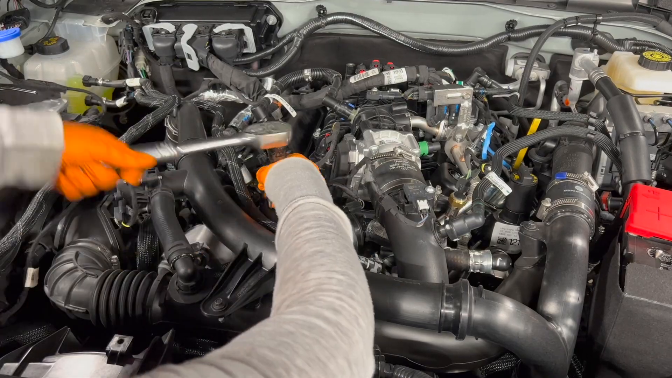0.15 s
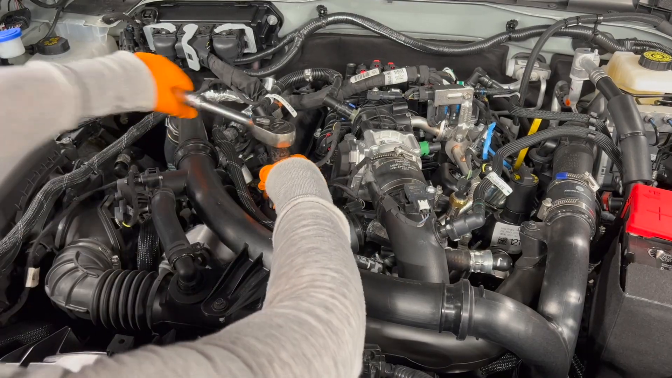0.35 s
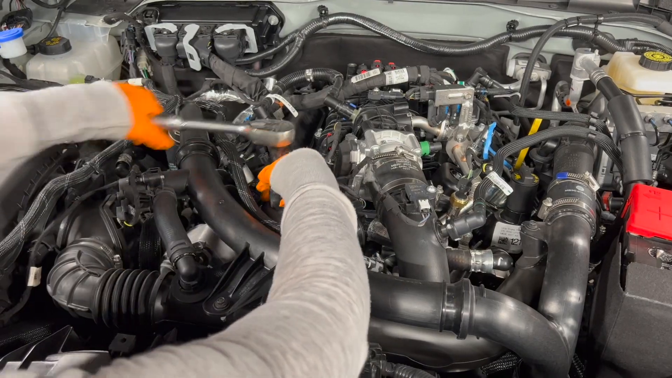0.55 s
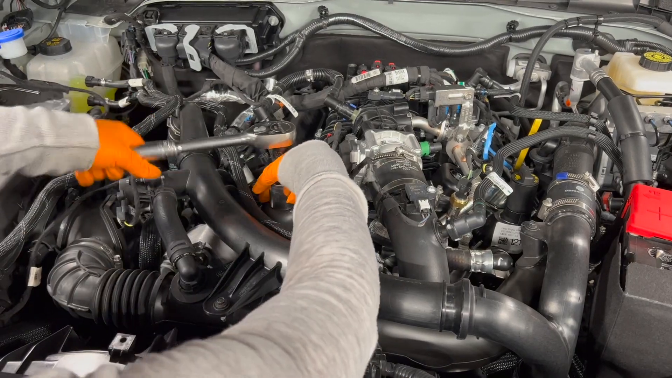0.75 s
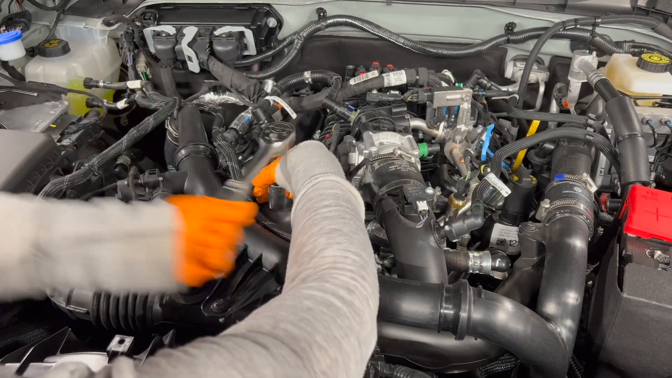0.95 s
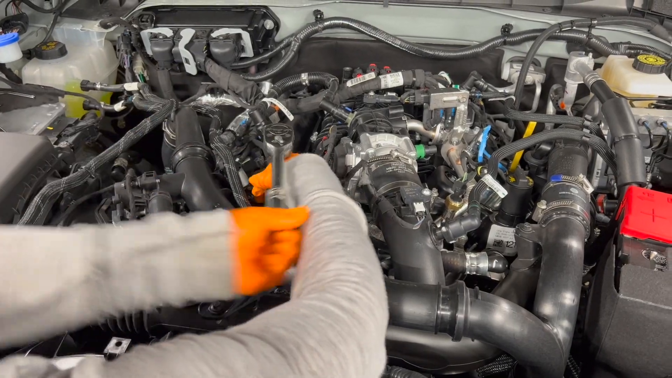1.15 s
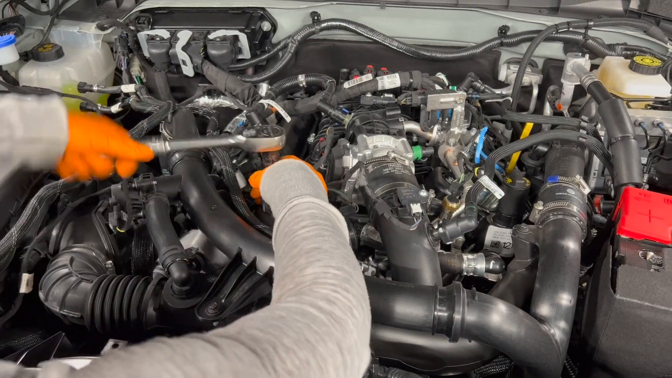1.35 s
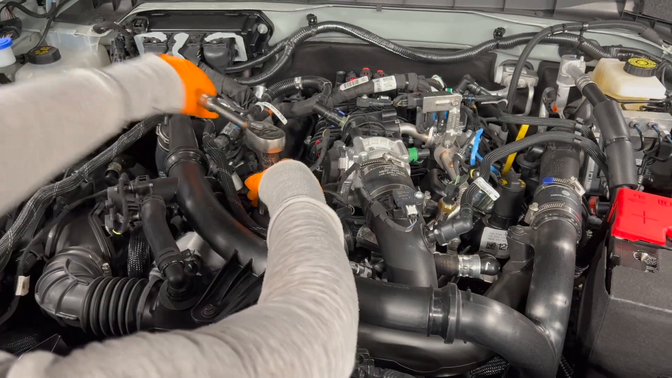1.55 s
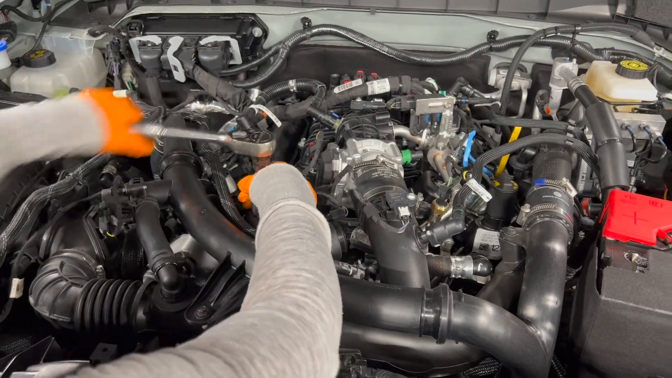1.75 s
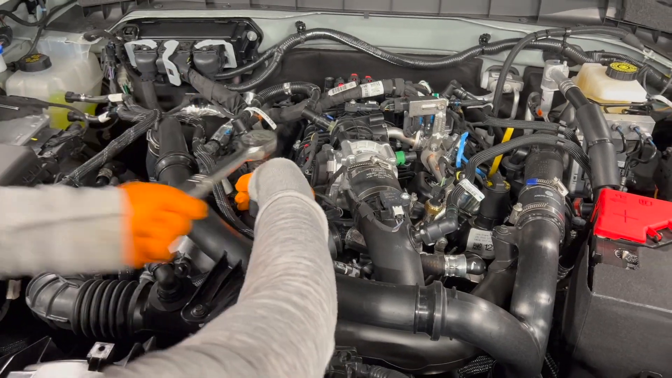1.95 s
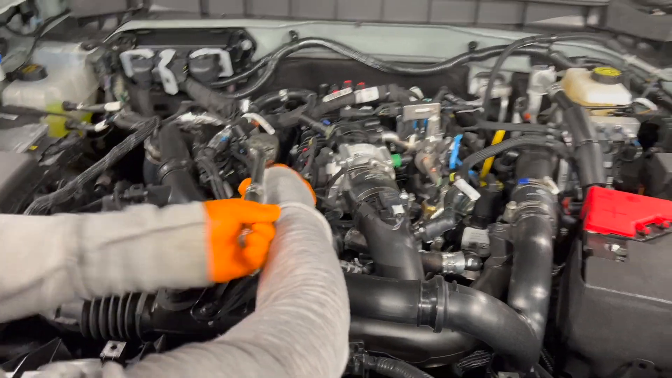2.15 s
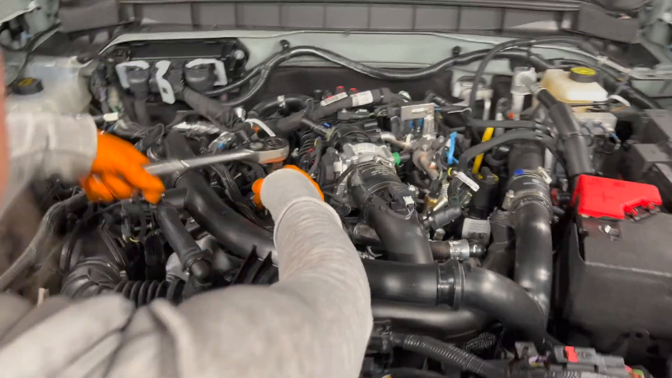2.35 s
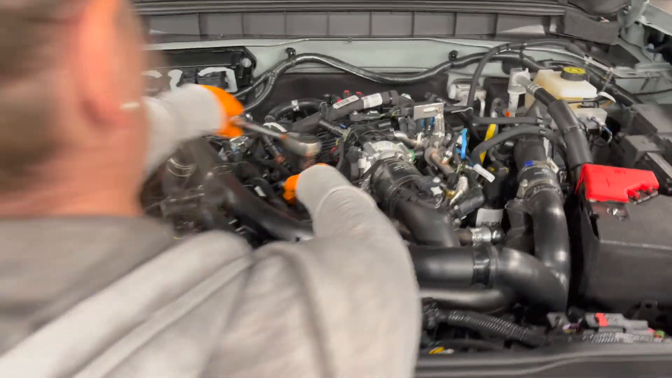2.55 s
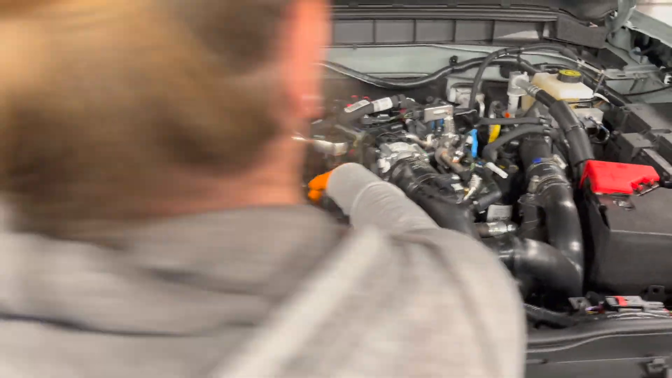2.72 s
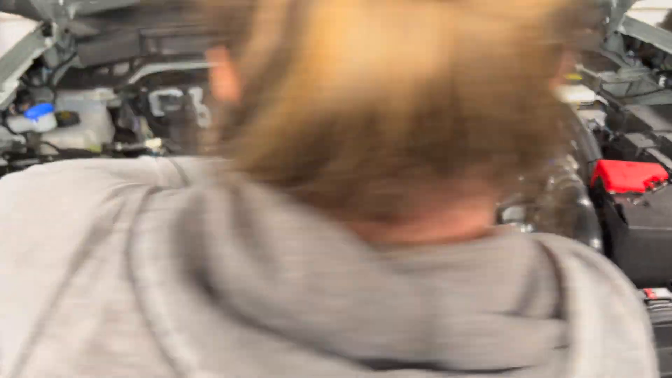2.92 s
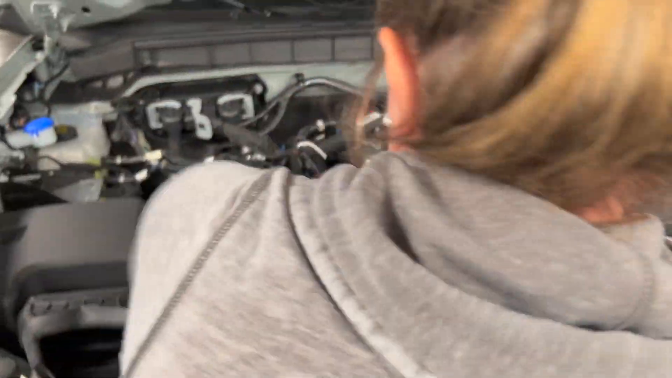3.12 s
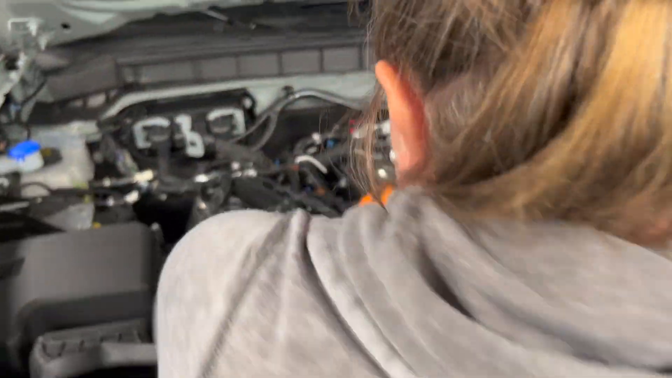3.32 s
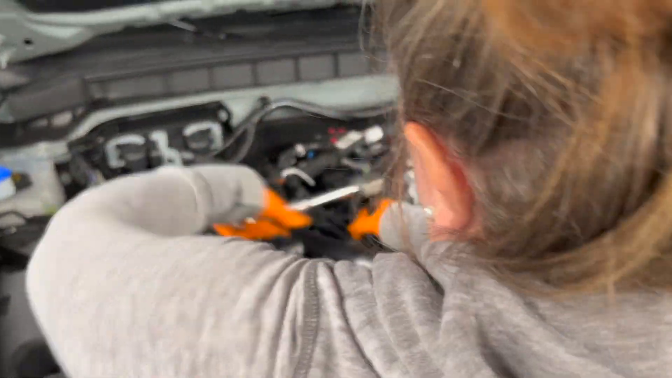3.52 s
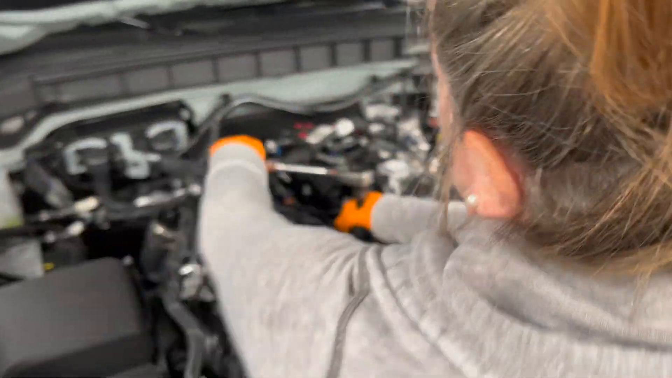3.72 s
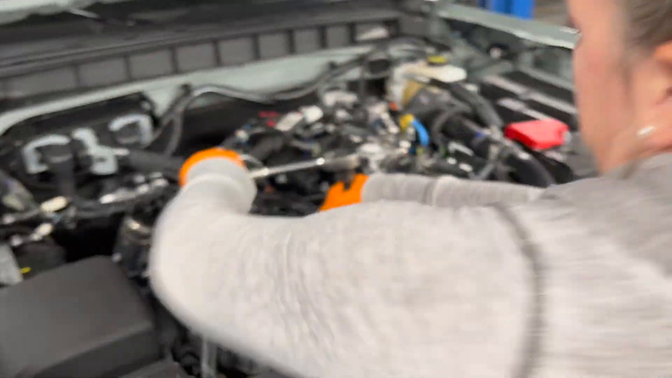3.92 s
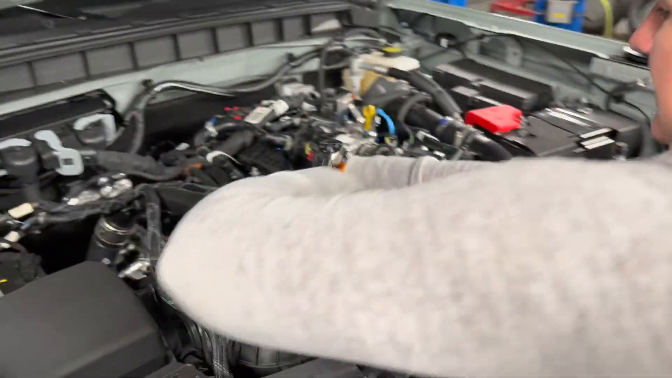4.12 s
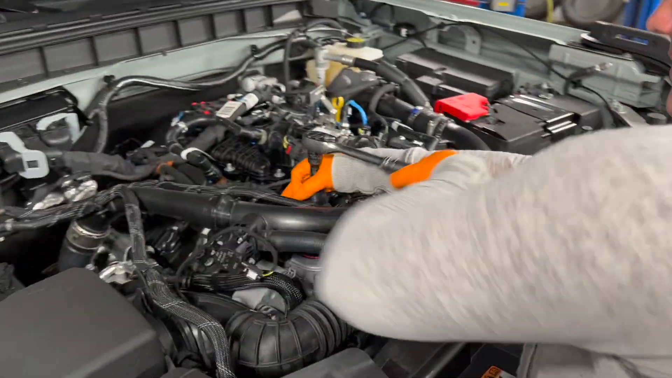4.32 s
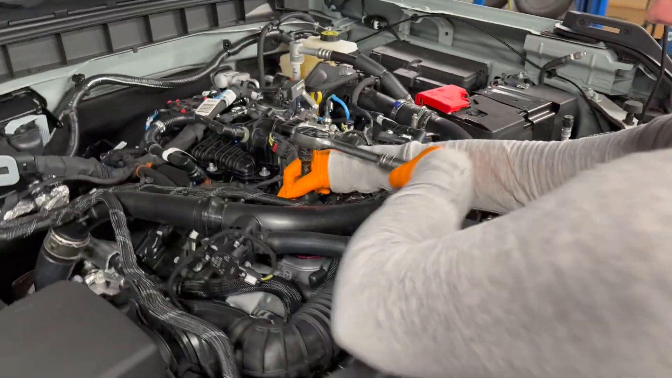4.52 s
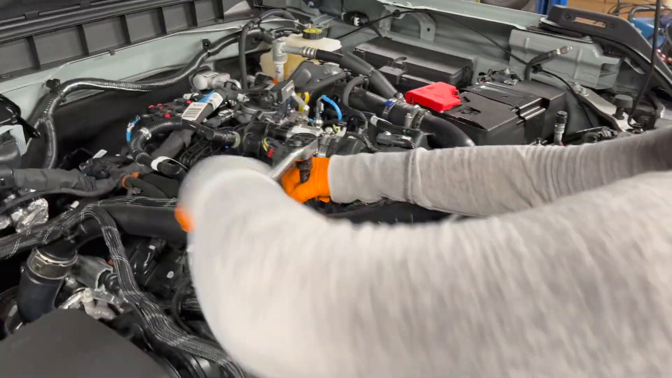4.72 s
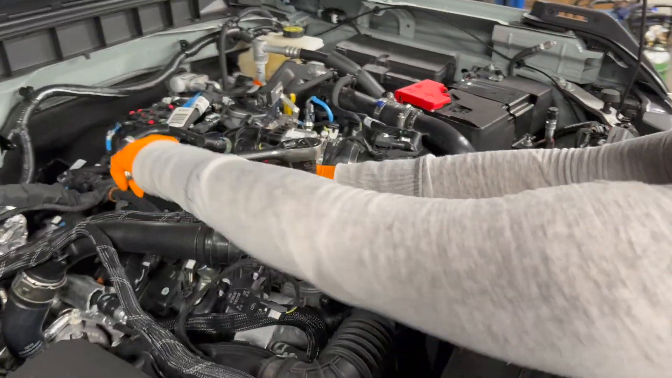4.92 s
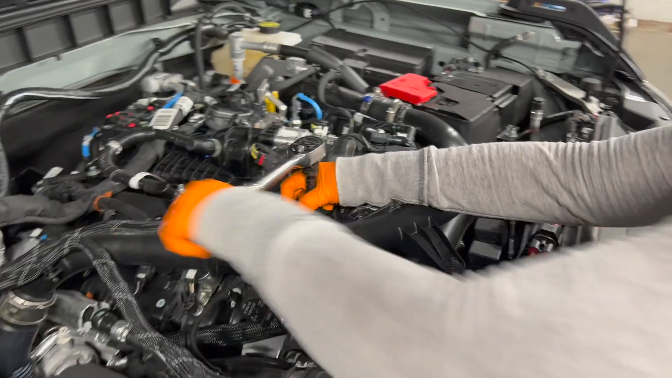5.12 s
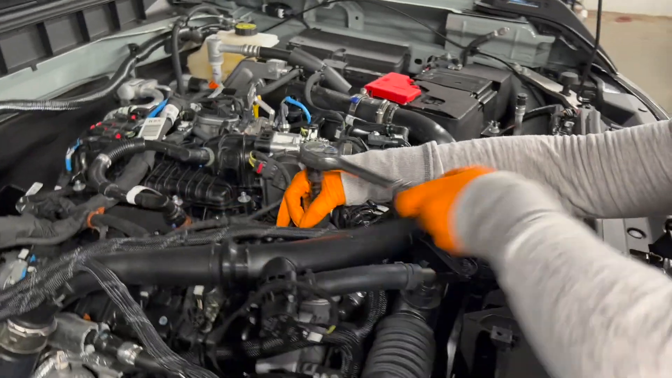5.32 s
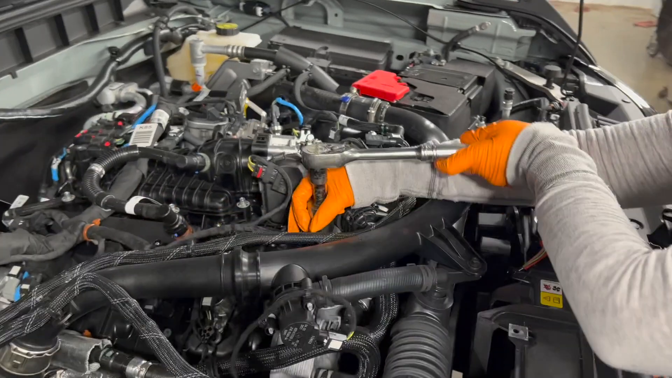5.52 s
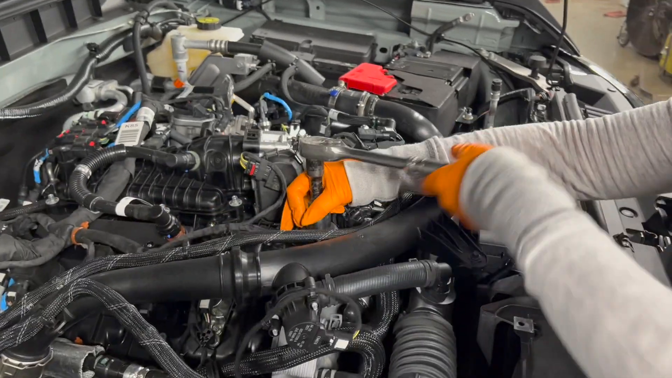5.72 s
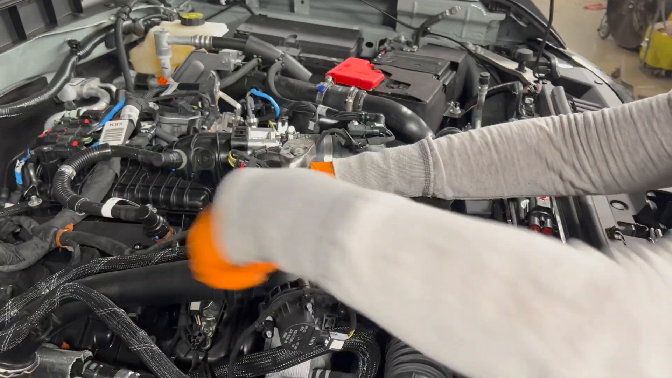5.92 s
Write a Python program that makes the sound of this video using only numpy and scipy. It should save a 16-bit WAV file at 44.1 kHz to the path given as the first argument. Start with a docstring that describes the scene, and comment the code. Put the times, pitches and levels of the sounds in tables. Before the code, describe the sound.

Short runs of crisp ratchet clicks repeat about once a second, separated by dull taps and cloth rubbing, above quiet wavering machine hum.

```python
"""A low wavering hum over moving air is heard first, then the quick clicks of a long hand ratchet in an engine bay.
On six back-swings the pawl drops once per tooth turned; each drop is a noise burst ringing steel tool and casting.
Between swings the socket knocks and taps as it is loaded, cloth rubs and swishes as filtered noise, and plastic
snaps once as a damped impulse. A diffuse garage tail follows, and two phone ports close by receive the sum."""
import sys
import numpy as np
from scipy import signal
from scipy.fft import rfft, irfft
from scipy.io import wavfile
from scipy.ndimage import uniform_filter1d

SR = 44100
rng = np.random.default_rng(int(sys.argv[2]) if len(sys.argv) > 2 else 0)


def bounce(signal):
    """Save signal as a 16-bit WAV file at the path given by the first command-line argument."""
    frames = np.transpose(np.atleast_2d(signal))
    limited = np.clip(frames, -1, 1)
    pcm = np.round(limited * 32767).astype(np.int16)
    wavfile.write(sys.argv[1], SR, pcm)


N = 262831
TIME = np.arange(N) / SR
HIT_TIME = TIME[:4096]
BLOW = int(0.014 * SR)  # samples over which the level of a hit is defined
TOP_HZ = 16350


def undb(db):
    """Logarithmic level: decibels become an amplitude ratio."""
    return 10 ** (np.asarray(db) / 20)


def unit(x):
    """Normalisation: scale to rms 1."""
    return x / np.sqrt(np.mean(x ** 2))


def over_bins(points):
    """Interpolation on a log-frequency axis: (f/Hz, value) points give one value per FFT bin."""
    hz, value = np.transpose(points)
    bin_hz = np.arange(N // 2 + 1) * SR / N
    return np.interp(np.log(bin_hz + 1), np.log(hz), value)


def colour(x, points):
    """Spectral shaping: weight a sound by (f/Hz, level/dB) points, then scale to rms 1."""
    return unit(irfft(rfft(x) * undb(over_bins(points)), N))


def band(x, low_hz, high_hz, order=2):
    """Causal band-pass filtering."""
    return signal.sosfilt(signal.butter(order, [low_hz, high_hz], "band", fs=SR, output="sos"), x)


def walk(rate):
    """Slow random modulation: levels held 1 / rate s, slewed from one to the next, rms 1."""
    hold = int(SR / rate)
    held = np.repeat(rng.standard_normal(N // hold + 1), hold)
    return unit(uniform_filter1d(held, hold)[:N])


def fade(fade_s, hold_s=0.002):
    """Exponential decay, after close reflections have held the blow up for an instant."""
    return np.exp(-np.maximum(HIT_TIME - hold_s, 0) / fade_s)


def swell(middle_s, half_s):
    """Gaussian envelope: a movement gathers and subsides."""
    return np.exp(-np.minimum(np.abs(TIME - middle_s) / half_s, 10) ** 2)


def place(hits, times, dbs):
    """Superposition: add hits (event, 2, sample) in time, each at its rms level over the blow."""
    out = np.zeros((2, N + len(HIT_TIME)))
    for hit, s, db in zip(hits, times, dbs):
        i = int(s * SR)
        blow_rms = np.sqrt(np.mean(hit[:, :BLOW] ** 2))
        out[:, i:i + len(HIT_TIME)] += hit * undb(db) / blow_rms
    return out[:, :N]


# steady machine hum and mains hum: f/Hz, level/dB
HUM_TONES = [(70.9, -51), (120, -61.5), (141.8, -78)]
# spectrum of ventilation rumble and still air: f/Hz, relative level/dB
AIR_SPECTRUM = [(20, -46.5), (34, -3), (45, -3.5), (66, 4.5), (100, -0.5), (200, -20), (450, -31),
                (1200, -37), (6000, -41.5), (16000, -57)]
AIR_DB = -50


def hum(waver_db=-4.15):
    """Amplitude modulation: pure machine tones waver slowly over the broadband noise of moving air."""
    tones = 0
    for hz, db in HUM_TONES:
        amplitude = np.sqrt(2) * undb(db + waver_db * walk(5.1))
        tones = tones + amplitude * np.sin(2 * np.pi * (hz * TIME + rng.random()))
    return tones + undb(AIR_DB) * colour(rng.standard_normal((2, N)), AIR_SPECTRUM)


# arms and body shift between swings: middle t/s, half length t/s, rubbing level/dB, sleeve swish level/dB
SHIFTS = [(0.826, 0.19, -94, -70.5), (1.176, 0.02, -49.5, -79), (1.858, 0.24, -73, -69),
          (2.702, .04, -54.5, -75), (3.193, 0.187, -59.5, -81.5), (3.918, 0.065, -48.5, -51.5),
          (4.116, 0.15, -73.5, -69), (4.515, 0.14, -57.5, -69.5), (5.258, 0.14, -62, -60)]
RESTING_DB = -79.5  # cloth never quite rests
# the sleeve slides along with each swing; rise and fall are exponential time constants
SLEEVE_LEAD_S, SLEEVE_RISE_S, SLEEVE_FALL_S = 0.01, 0.063, 0.13
# the glove scuffs after every knock, relative to the knock column of KNOCKS
SCUFF_DB, SCUFF_S = -22, 0.025


def sliding():
    """Addition of powers: the rubbing grows before each swing, decays after it, and swells with shifts and scuffs."""
    power = undb(RESTING_DB) ** 2
    for s, half_s, db, _ in SHIFTS:
        power = power + (undb(db) * swell(s, half_s)) ** 2
    for course, *_, sleeve_db in SWINGS:
        early = np.maximum(course[0][0] - SLEEVE_LEAD_S - TIME, 0) / SLEEVE_RISE_S
        late = np.maximum(TIME - course[-1][0], 0) / SLEEVE_FALL_S
        power += (undb(sleeve_db) * np.exp(-early - late)) ** 2
    for s, knock_db, *_ in KNOCKS:
        i = int(s * SR)
        power[i:i + len(HIT_TIME)] += (undb(knock_db + SCUFF_DB) * fade(SCUFF_S)) ** 2
    return np.sqrt(power)


# spectrum of the rubbing cloth: f/Hz, relative level/dB
CLOTH_SPECTRUM = [(100, 5.5), (300, -3), (600, -2.5), (950, 1), (1500, -1), (4500, -13.5), (7000, -15),
                  (16000, -42.5)]


def rubbing(catch_db=1.5, flutter_db=5.0, fibre_db=2.5):
    """Stick-slip friction: cloth moves in small catches and slips, each register fluttering independently."""
    edges = np.geomspace(90, TOP_HZ, 8)
    slip = 0
    for low_hz, high_hz in zip(edges, edges[1:]):
        register = band(rng.standard_normal((2, N)), low_hz, high_hz)
        slip = slip + register * undb(flutter_db * walk(45))
    strength = sliding() * undb(catch_db * walk(55))
    return strength * colour(slip * undb(fibre_db * walk(500)), CLOTH_SPECTRUM)


def teeth(course, *levels):
    """Kinematics of the pawl: integrated handle speed gives one drop per tooth; rows are
    (t/s, speed/teeth per s, click level/dB, levels of the swing)."""
    s, speed, db = np.transpose(course)
    t = np.arange(s[0], s[-1], 1 / SR)
    turned = np.cumsum(np.interp(t, s, speed)) / SR
    drops = np.interp(np.arange(turned[-1]), turned, t)
    return [(drop, np.interp(drop, s, speed), np.interp(drop, s, db), *levels) for drop in drops]


GRIP_WIDTH_HZ = 85  # damping by the gloved hand, added to the width of every resonance


def ring(x, modes):
    """Modal superposition: a sum of damped resonances (f/Hz, width/Hz, level/dB), widened by the grip."""
    rung = 0
    for hz, width_hz, db in modes:
        quality = hz / (width_hz + GRIP_WIDTH_HZ)
        rung = rung + undb(db) * signal.lfilter(*signal.iirpeak(hz, quality, fs=SR), x)
    return rung


# resonances of the ratchet seated on the cap: f/Hz, width/Hz before the grip, level/dB
TOOL_MODES = [(983, 14, 1), (1207, 150, -11), (1445, 37, 6.5), (2144, 500, -1.5), (3106, 160, -0.5),
              (5990, 74, 4.5), (6422, 81, 5.5), (7590, 370, -1), (8034, 85, 0), (11805, 120, -9),
              (12860, 260, -4), (15350, 740, 8)]


def strikes(times, levels, parts, rebound_s, rebound, crack_db, grit, scatter_db):
    """Impact excitation: steel lands, rebounds once and chatters; the tool's modes ring in each part's register."""
    chance = rng.standard_normal((len(times), 6, len(HIT_TIME)))
    # own[k] holds one random number per hit
    own = chance[:, 5, :, None, None].swapaxes(0, 1)
    lag_s = rebound_s * np.exp(0.3 * own[-1])
    # tiny impacts of uneven size, smeared by the crowded engine bay
    chatter = np.exp(grit * np.repeat(chance[:, 4:5, :256], 16, axis=-1))
    # spectrum of a blow repeated a moment later
    hz = np.fft.rfftfreq(len(HIT_TIME), 1 / SR)
    repeat = 1 + rebound * np.exp(-2j * np.pi * hz * lag_s)
    out = 0
    for (low_hz, high_hz, fade_s), dbs in zip(parts, levels):
        burst = chance[:, :4] * chatter * fade(fade_s)
        force = irfft(rfft(burst) * repeat)
        rung = 0
        for mode, luck in zip(TOOL_MODES, own):
            if low_hz / 2 < mode[0] < 2 * high_hz:
                # every contact favours other modes
                rung = rung + undb(scatter_db * luck) * ring(force[:, :2], [mode])
        crack = undb(crack_db) * force[:, 2:]
        out = out + place(band(rung + crack, low_hz, high_hz, order=4), times, dbs)
    return out


# course of the hand on each back-swing: t/s, handle speed/teeth per s, click level/dB
SWING_1 = [(0.048, 34.4, -38.6), (0.0786, 48.6, -34.6), (0.2058, 29.1, -40.6), (0.2935, 34.4, -32.1),
           (0.3364, 20.3, -35.0)]
SWING_2 = [(1.232, 35.8, -32.2), (1.287, 48.1, -25.3), (1.3216, 49.7, -42.9), (1.3927, 26.5, -33.2),
           (1.4336, 40.0, -39.9), (1.5305, 24.7, -34.1)]
SWING_3 = [(2.244, 38.2, -31.5), (2.2926, 43.1, -30.5), (2.3758, 54.7, -37.9), (2.4005, 33.7, -43.5),
           (2.4449, 20.6, -31.5), (2.5626, 28.4, -35.3)]
SWING_4 = [(3.392, 33.6, -40.0), (3.4648, 47.1, -35.9), (3.4701, 18.4, -41.8), (3.52, 46.0, -44.3),
           (3.553, 21.2, -42.1), (3.6423, 41.5, -31.1), (3.6932, 19.2, -36.0)]
SWING_5 = [(4.5743, 37.3, -33.7), (4.6489, 43.0, -32.6), (4.6493, 59.4, -44.7), (4.7361, 20.3, -35.3),
           (4.819, 39.6, -38.2), (4.8949, 18.0, -31.8)]
SWING_6 = [(5.6948, 37.5, -28.7), (5.8689, 31.7, -38.9), (5.8792, 36.3, -32.9), (5.9364, 28.9, -33.0)]
# back-swings: course, casting level/dB, handle level/dB, head and pawl level/dB against the click,
# sleeve level/dB; handle speed, click level and chance shift the part levels from tooth to tooth
SWINGS = [(SWING_1, -43, -40.5, -1.5, 0, -55.5), (SWING_2, -45, -40.5, -1.4, -.5, -55),
          (SWING_3, -42, -42, 0, -0.84, -54.5), (SWING_4, -54, -43, -2.4, 0.65, -55),
          (SWING_5, -42, -39, -0.74, 0.23, -52), (SWING_6, -39.5, -40, -4.1, 1.9, -51)]
# registers of casting, handle, head and pawl: low f/Hz, high f/Hz, fade time constant t/s
RATCHET_PARTS = [(620, 2520, 0.0054), (2730, 5510, 0.0061), (5650, 6890, 0.0038), (7090, 13770, 0.0048)]
# teeth that catch and snap back hard: t/s, extra click level/dB
HARD_DROPS = [(0.094, 2), (1.258, 0), (1.403, 1), (1.28, 2), (2.244, 1.5), (2.293, 7.5), (4.887, 0),
              (5.722, 1), (5.75, 2), (5.897, 2)]
# the bare steel socket rings on after each click: f/Hz, 60 dB decay time t/s, level/dB
SOCKET_RING = [(3224, 0.1, 0.5), (5910, 0.35, -5)]
USUAL_TEETH_PER_S = 36
TOOTH_MATCH_S = 0.008  # a hard drop applies to teeth this near
TOOTH_DB = 0.8  # random spread of each part's level from tooth to tooth
# a fast handle shakes casting and head, a slow one lets the pawl stand out (dB per doubling of speed)
CASTING_SPEED_DB, HEAD_SPEED_DB, PAWL_SPEED_DB = 4.5, 4.2, -2.5


def ratchet():
    """Periodic impacts on coupled resonators: each pawl drop shakes four parts, and the socket rings on."""
    drops = np.vstack([teeth(*swing) for swing in SWINGS])
    times, speed, click, casting, handle, head, pawl, _ = drops.T
    click = click + sum(db * (np.abs(times - s) < TOOTH_MATCH_S) for s, db in HARD_DROPS)
    haste = np.log2(speed / USUAL_TEETH_PER_S)
    uneven = TOOTH_DB * rng.standard_normal((len(times), 4)).T
    levels = uneven + [casting + CASTING_SPEED_DB * haste,
                       handle + (click - np.mean(click)) / 2,
                       head + click + HEAD_SPEED_DB * haste,
                       pawl + click + PAWL_SPEED_DB * haste]
    clicks = strikes(times, levels, RATCHET_PARTS, rebound_s=0.0018, rebound=0.65,
                     crack_db=-10.5, grit=0.36, scatter_db=3.5)
    ringing = 0
    for hz, t60_s, db in SOCKET_RING:
        quality = hz * t60_s * np.pi / np.log(1000)
        ringing = ringing + undb(db) * signal.lfilter(*signal.iirpeak(hz, quality, fs=SR), clicks)
    return clicks + ringing


def taps(count=70, knock_db=-2, thud_db=-12, edge_db=-9, spread_db=3.5):
    """Random point process: light touches of glove and tool, as strong as the movement; rows are
    (t/s, knock level/dB, thud level/dB, metal edge level/dB)."""
    when, luck = rng.random((count, 2)).T
    # one touch at a random moment in each equal time slot
    times = (np.arange(count) + when) / count * TIME[-1]
    movement_db = 20 * np.log10(np.interp(times, TIME, sliding()))
    db = movement_db + spread_db * (2 * luck - 1)
    return np.column_stack([times, db + knock_db, db + thud_db, db + edge_db])


# the socket takes up its slack and the handle bumps: t/s, then knock, thud and metal edge level/dB
# before the offsets in socket()
KNOCKS = [(0.393, -43, -70, -39.5), (0.408, -37.5, -84, -58), (0.495, -38.5, -73, -53),
          (0.533, -38.5, -50.5, -48.5), (0.995, -44.5, -83, -54.5), (1.126, -37.5, -70.5, -62),
          (1.131, -47, -75, -56.5), (1.173, -39, -55, -58), (1.646, -44, -81, -48),
          (1.677, -35.5, -67, -58), (1.693, -30.5, -66, -46.5), (2.204, -26.5, -52, -33.5),
          (3.225, -43, -67, -64.5), (3.867, -38.5, -43.5, -55), (3.891, -31.5, -49.5, -65),
          (4.463, -43.5, -58, -49.5), (4.931, -35, -46.5, -43), (5.068, -38.5, -47, -55),
          (5.173, -38.5, -63, -60), (5.613, -45, -58, -56)]
# registers of thud, knock and metal edge: low f/Hz, high f/Hz, fade time constant t/s
KNOCK_PARTS = [(223, 724, 0.0077), (756, 3200, 0.0093), (2650, 8480, 0.0041)]


def socket(edge_db=-4.0, knock_db=-10, thud_db=-0.5):
    """Impact on load reversal: duller knocks as the slack is taken up, with light taps between them."""
    knocks = np.array(KNOCKS) + [0, knock_db, thud_db, edge_db]
    times, knock, thud, edge = np.vstack([knocks, taps()]).T
    return strikes(times, [thud, knock, edge], KNOCK_PARTS, rebound_s=0.000948, rebound=1.0,
                   crack_db=-4.5, grit=0.35, scatter_db=5.5)


def swish(catch_db=3.0, low_hz=1700, high_hz=5200):
    """Friction noise: a sleeve that moves fast adds a brighter band of hiss."""
    strength = sum(undb(db) * swell(s, half_s) for s, half_s, _, db in SHIFTS)
    hiss = unit(band(rng.standard_normal((2, N)), low_hz, high_hz))
    return strength * undb(catch_db * walk(110)) * hiss


# resonances of the snapping plastic: f/Hz, width/Hz before the grip width is added, level/dB
SNAP_MODES = [(1146, 480, 3.5), (2340, 630, 11.5), (3900, 630, 11), (4500, 550, -7)]
SNAP_S, SNAP_DB = 5.3843, -31.5


def snap(scatter=0.11, scatter_s=0.002):
    """Impulse response: one sharp release in well-damped plastic, with a little scatter from nearby parts."""
    force = scatter * rng.standard_normal((2, len(HIT_TIME))) * fade(scatter_s)
    force[:, 0] += 1  # the impulse
    return place([band(ring(force, SNAP_MODES), 770, 4200)], [SNAP_S], [SNAP_DB])


GARAGE_T60_S, GARAGE_DB = 0.36, -18.5


def garage(x, gap_s=0.012, treble_t60_s=0.24):
    """Diffuse reverberation: convolution with decaying noise, whose treble dies first."""
    t = TIME[:SR]
    noise = rng.standard_normal((2, SR))
    body = band(noise, 130, 6800) * undb(-60 * t / GARAGE_T60_S)
    treble = band(noise, 13000, TOP_HZ) * undb(-60 * t / treble_t60_s)
    tail = (body + treble) * np.minimum(t / gap_s, 1)
    # the tail has unit energy, averaged over its two rows
    return undb(GARAGE_DB) * signal.fftconvolve(x, unit(tail) / np.sqrt(SR), axes=1)[:, :N]


# phase between the two ports: f/Hz, lead of left over right/rad
PORT_PHASE = [(1200, .1), (3000, 1.2), (4600, 1.2), (6000, .2), (7400, .8), (8400, 0), (10250, -3.14),
              (12000, -6.28), (15400, -12.56)]
# likeness of the two ports: f/Hz, likeness from 0 to 1
PORT_LIKENESS = [(70, 1), (600, 0.61), (3400, 0.86), (5000, 0.17), (6300, 0.5), (12000, 1)]
# balance of the two ports: f/Hz, left minus right level/dB
PORT_BALANCE = [(1000, -0.7), (1480, -2), (1800, 2), (3200, 1), (5200, 2), (11000, 0)]


def ports(x):
    """Coherence and diffraction: row 0 is common, row 1 opposed; the phone's body shifts phase and balance."""
    common, diffuse = rfft(x)
    likeness = np.clip(over_bins(PORT_LIKENESS), 0, 1)
    common = common * np.sqrt((1 + likeness) / 2)
    diffuse = diffuse * np.sqrt((1 - likeness) / 2)
    # half of each difference goes to either port
    lean = undb(over_bins(PORT_BALANCE) / 2) * np.exp(1j * over_bins(PORT_PHASE) / 2)
    return irfft(np.array([(common + diffuse) * lean, (common - diffuse) / lean]), N)


def scene():
    """Linear superposition: tool, knocks and cloth with their reverberation, over the hum."""
    work = undb(0.5) * ratchet() + undb(-1) * socket() + rubbing() + swish()
    # the snap is close to the phone and stirs the room less
    near = snap()
    return ports(work + near + garage(work + undb(-6) * near) + hum())


def record(dry):
    """Band limitation: a steep low-pass, the phone cuts the top."""
    return signal.sosfilt(signal.ellip(8, 0.2, 70, TOP_HZ, fs=SR, output="sos"), dry)


dry = scene()
out = record(dry)
bounce(out)
```